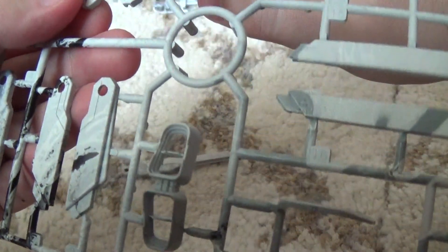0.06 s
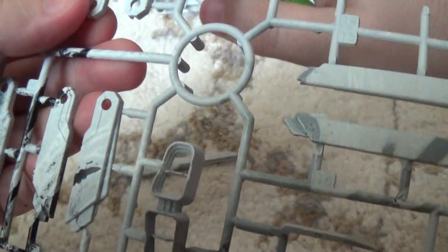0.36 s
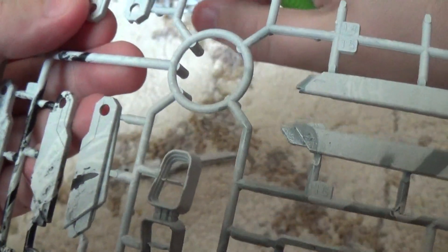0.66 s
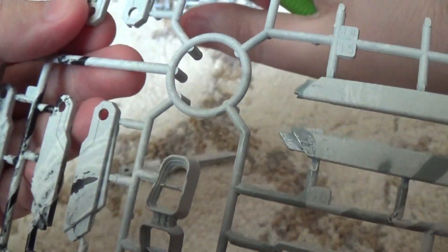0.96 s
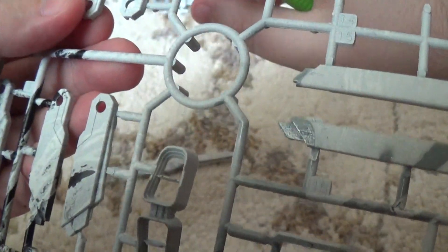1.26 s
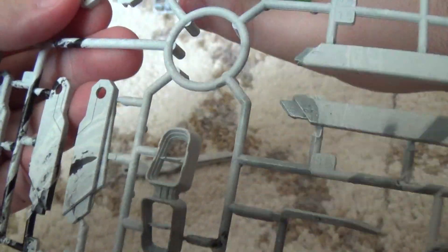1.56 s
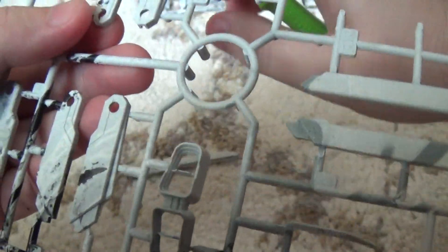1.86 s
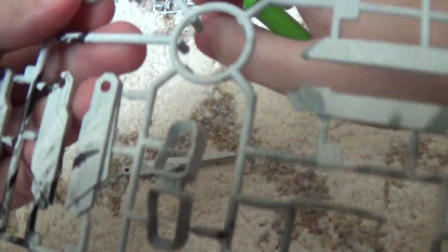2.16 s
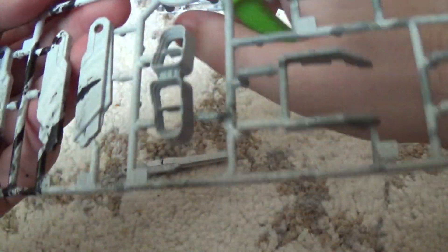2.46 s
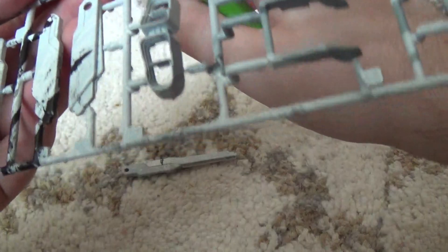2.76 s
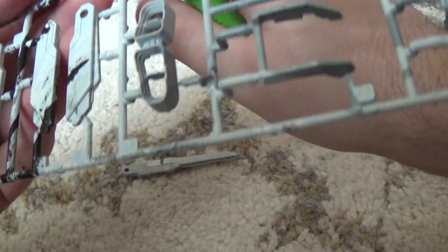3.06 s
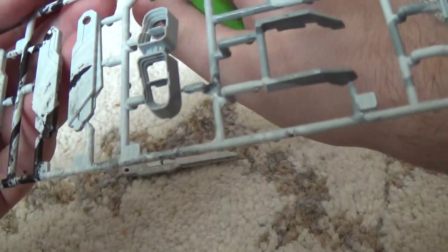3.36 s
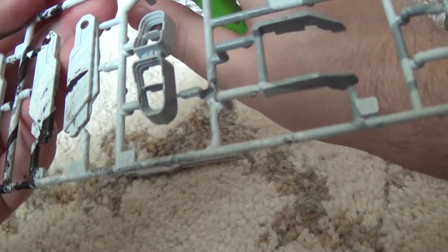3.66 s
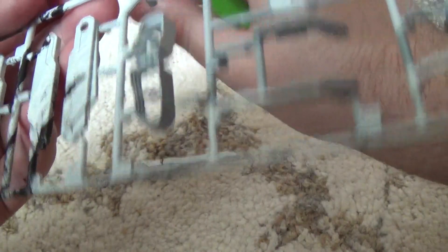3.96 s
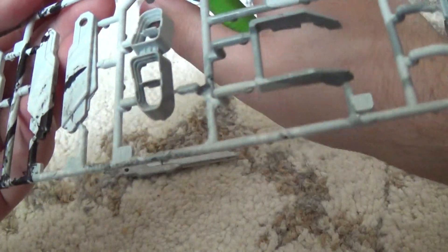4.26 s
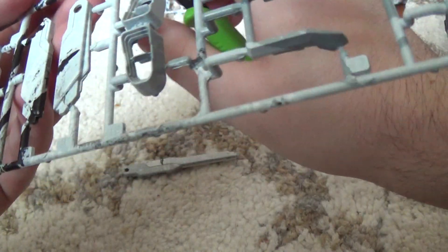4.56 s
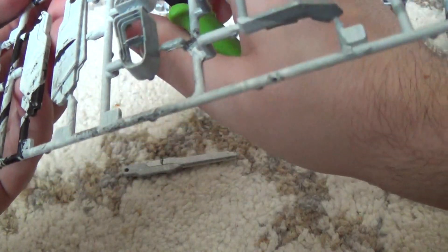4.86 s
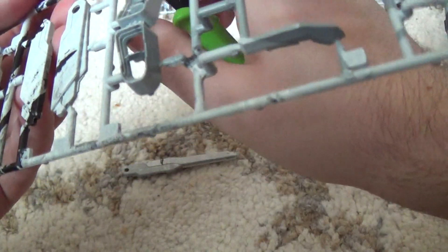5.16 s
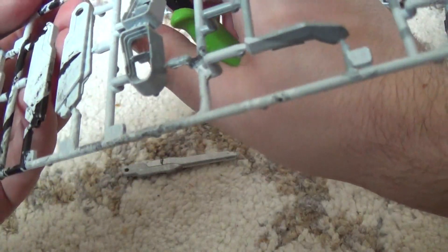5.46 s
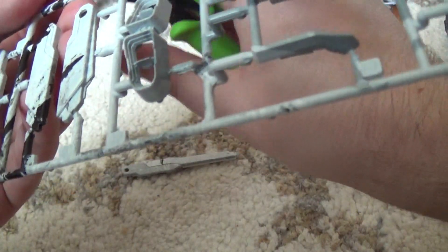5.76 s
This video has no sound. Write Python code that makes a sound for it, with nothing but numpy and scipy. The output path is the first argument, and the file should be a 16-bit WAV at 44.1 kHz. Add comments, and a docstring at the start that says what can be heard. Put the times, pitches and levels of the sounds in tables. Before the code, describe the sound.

Three crisp snips of small cutters through plastic, spaced by light ticks and a soft hollow pop, over faint hiss and hum.

```python
"""A quiet room, camera microphone close up: side cutters snip three parts off a plastic model-kit frame.
Hiss, mains hum and a thin electronic whine run throughout; from the start the handled frame ticks.
At 1.3 s the plastic strains and cracks twice, a millisecond apart; the steel jaws ring, the frame recoils
and each cut has its own ringing colour. A part flexes with a hollow tock, the blades scrape into place
and cut again at 4 s. A blade creaks at 4.6 s, and one more scrape leads to the last cut at 5.7 s."""
import sys
import numpy as np
from scipy import signal
from scipy.fft import rfft, irfft, next_fast_len
from scipy.io import wavfile
from scipy.ndimage import uniform_filter1d

SR = 44100
rng = np.random.default_rng(int(sys.argv[2]) if len(sys.argv) > 2 else 0)


def int16_out(signal):
    """Quantize to a 16-bit WAV file."""
    q = np.round(np.clip(np.atleast_2d(signal).T, -1, 1) * 32767)
    wavfile.write(sys.argv[1], SR, q.astype(np.int16))


N = 260704

# the room's decay: f/Hz, t60/s
ROOM_DECAY = [(150, 0.33), (1000, 0.17), (6000, 0.19), (14000, 0.13)]
# side signal of the reflections: f/Hz, level/dB
WIDTH = [(100, -17), (380, -19), (700, -3), (1300, -8), (2400, -5.5), (5000, -3.5), (15000, -4)]
# room tone spectra, mid and side: f/Hz, relative level/dB
AIR_MID = [(12, -28), (25, -5), (50, -0.5), (100, -0.5), (175, -0.5), (210, -5.5), (370, -7.5), (520, -11),
           (1000, -13.5), (3000, -15.5), (8000, -18), (15500, -20.5)]
AIR_SIDE = [(30, -24), (100, -13.5), (300, -3), (800, 0), (2000, -4), (4000, -9.5), (8000, -16.5),
            (15000, -34)]
# mains harmonics: f/Hz, level/dB
HUM = [(60, -80.5), (120, -73), (180, -79.5)]
# light contacts on the frame: t/s, level/dB, hardness (relative treble)/dB, nudge level/dB
TICKS = [(0.0315, -31, -13, -38), (0.0906, -39, -24, -37), (0.2162, -45, -4, -52),
         (0.2413, -35, -15.5, -31.5), (1.5278, -36, -3.5, -57), (2.005, -35.5, -17.5, -56),
         (2.6703, -27, -20.5, -37), (2.769, -33, -27, -33.5), (3.3273, -31.5, -14, -35.5),
         (3.6544, -43, -26, -34.5), (3.971, -40, -8.5, -56), (4.154, -34, -10, -49),
         (4.302, -27.5, -16, -47), (4.6608, -26, -16.5, -43)]
# spectra of a contact's dull tap and hard edge: f/Hz, relative level/dB
DULL_TAP = [(100, -1), (400, -2.5), (650, -3), (1000, -9), (2200, -1.5), (3000, -6.5), (4000, -7),
            (8000, -34), (15000, -32)]
HARD_EDGE = [(1000, -37), (4000, -8), (6800, 1.5), (9000, -2.5), (11500, 0.5), (14000, -14), (16000, -17)]
# modes of the frame, tapped and nudged as a whole: f/Hz, relative level/dB, t60/s
FRAME_MODES = [(1380, -8, 0.11), (1650, -4, 0.025), (2060, 4, 0.019), (2390, 11.5, 0.014),
               (2555, -13, 0.21), (2855, -1, 0.022), (3580, -17, 0.016), (4150, -3, 0.026),
               (4580, -1, .025), (5100, 7, 0.022)]
SWAY_MODES = [(179, -0.5, 0.052), (297, -5.5, 0.085), (382, 2, 0.14)]
# tiny cracks under the blades: t/s, level/dB
STRAINS = [(1.3228, -37), (1.3322, -35), (1.338, -39), (3.997, -35)]
# the cuts: t/s, first crack/dB, second crack/dB, crack pitch ratio, jaws/dB, jaw centre f/Hz,
# ringing colour/dB, snap/dB, snap pitch ratio, recoil/dB, knock/dB, knock f/Hz, room send/dB
CUTS = [(1.3477, 2.5, -1, 0.89, -8, 9500, -2, -18, 1.54, -20, -20.5, 372, -1.5),
        (4.0032, -8, 2, 1.03, -5, 7700, -7, -9, 1.06, -23.5, -14, 342, -1.5),
        (5.7416, -5, 3.5, 1.03, -8, 8000, -6, -12.5, 1.05, -25, -18, 348, -0.5)]
# spectra of a crack's lower skirt and the frame's dry snap: f/Hz at pitch ratio 1, relative level/dB
CRACK_SKIRT = [(200, -24), (900, -28.5), (2000, -17.5), (4400, -16), (5650, -1.5)]
SNAP = [(200, -33), (900, -28.5), (1250, -8), (1600, -2), (2020, 4.5), (2230, -2.5), (2480, 0), (2900, -1),
        (4200, -3.5), (5000, -12), (9000, -12.5)]
# treble of a crack: f/Hz, relative level/dB
CRACK_TREBLE = [(6900, 0.5), (8300, 0), (9900, -4), (11800, 1), (14000, -9), (16000, -13)]
# modes of the steel jaws and the recoiling frame: f/Hz, relative level/dB, t60/s
JAW_MODES = [(5240, 0, 0.031), (6000, -3, 0.017), (6450, -5, 0.013), (7550, 2, 0.01), (7830, 5.5, 0.009),
             (8710, 8.5, 0.011), (11300, -5, 0.011), (12600, -14, 0.012)]
RECOIL_MODES = [(126, -2.5, 0.046), (215, 4.5, 0.026), (380.6, -7, 0.2)]
# each cut's own ringing colour, brief bright peaks over a faint low ring: f/Hz, relative level/dB, t60/s
CUT_RING_MODES = [
    [(378, -22, .27), (1340, -30, .1), (2190, -8, 0.011), (2420, -4, 0.011), (2470, -28, 0.14),
     (4900, -5, .009), (5740, -1, .014), (8620, -8, .012), (10280, 2.5, 0.012), (11330, 3, 0.014)],
    [(680, -8, .025), (1326, -16, .06), (1610, -3, 0.02), (1970, -1, 0.02), (2480, -1, 0.022),
     (3230, 0.5, .01), (4130, -2, 0.023), (6180, 6, 0.014), (12400, 5.5, .01)],
    [(635, -33, .13), (1280, -23, .06), (1630, -20, 0.041), (2100, -10, .012), (2820, -14, 0.018),
     (3650, -17.5, .04), (4520, -13.5, 0.019), (6640, 1, .014), (12100, 3, .007)],
]
# parts flexing: t/s, level/dB, which part
TOCKS = [(1.955, -15, "shell"), (3.327, -26, "strut"), (4.661, -31, "strut")]
# modes of a shell-like part and a thin strut: f/Hz, relative level/dB, t60/s
SHELL_MODES = [(1230, -17, 0.004), (1660, -4.5, 0.015), (2500, -5, 0.0059), (3480, -11, 0.0065)]
STRUT_MODES = [(1630, 2.5, 0.017), (2470, 4, 0.018), (2860, 2.5, 0.015), (4230, -10, .02), (7000, -5, .009)]
# blades sliding into place: start t/s, end t/s, level/dB
SCRAPES = [(2.788, 2.86, -69), (4.247, 4.324, -60), (4.368, 4.436, -65.5), (5.14, 5.302, -65)]
# spectrum of steel sliding on plastic: f/Hz, relative level/dB
RASP = [(150, -23), (500, 4), (1000, -2), (2000, -4), (4000, -2.5), (6500, 0), (9000, -4.5), (11600, 4.5),
        (13500, -16), (16000, -18)]
# a blade creaking on the plastic: start t/s, end t/s, level/dB
CREAK = (4.6277, 4.641, -23.5)
# modes of blade against frame: f/Hz, relative level/dB, t60/s
SQUEAK_MODES = [(1690, -2, 0.02), (1955, -1, 0.032), (3020, -2, 0.05), (5030, -2, 0.025), (6660, 2, 0.015),
                (7740, -6, .015)]
# the edge singing as it seats: start t/s, length/s, f/Hz, peak level/dB
SQUEAL = (4.633, .009, 11350, -54)

WHINE_HZ, FRAME_RATE_HZ, TOP_HZ = 15734, 30, 16150  # the whine of a television's line scan, the camera's frame rate and band limit
TICK_T60_S, TICK_RING_DB = 0.019, -7.5
BITE_S, BITE_DB = 0.0023, -49  # the edges bite this long before the first crack
STEP_S, CRACK_T60_S = 0.00109, 0.0049  # the plastic gives way in two steps, this far apart
RELEASE_S = 0.0003  # from the first crack until the frame springs free
KNOCK_DELAY_S, KNOCK_RISE_S, KNOCK_T60_S = 0.0005, 0.013, 0.023  # the freed frame jumps in the hand


def amp(db):
    """Decibels to gain."""
    return 10 ** (np.asarray(db) / 20)


def unit_rms(x):
    """Scale to rms 1."""
    return x / np.sqrt(np.mean(x ** 2) + 1e-20)


def unit_energy(x):
    """Scale to energy 1."""
    return x / (np.linalg.norm(x) + 1e-20)


def along(points, hz):
    """Read (f/Hz, value) points on a log frequency axis."""
    freqs, values = np.transpose(points)
    return np.interp(np.log(hz + 1), np.log(freqs), values)


def filtered(x, response):
    """Zero-phase filter whose gain is response(hz)."""
    n = x.shape[-1]
    size = next_fast_len(n + SR // 4)
    return irfft(rfft(x, size) * response(np.fft.rfftfreq(size, 1 / SR)), size)[..., :n]


def coloured(x, spectrum, size=2048):
    """Causal filter with the given spectrum, so that attacks stay sharp."""
    gain = amp(along(spectrum, np.fft.rfftfreq(size, 1 / SR)))
    cepstrum = irfft(np.log(gain))
    cepstrum[1:size // 2] *= 2
    cepstrum[size // 2:] = 0
    return signal.fftconvolve(x, irfft(np.exp(rfft(cepstrum))))[:len(x)]


def noise(spectrum):
    """Steady noise of rms 1."""
    return unit_rms(filtered(rng.standard_normal(N), lambda hz: amp(along(spectrum, hz))))


def clock():
    """The time axis of one short sound."""
    return np.arange(SR // 3) / SR


def fade(t, t60):
    """Exponential decay by 60 dB in t60."""
    return np.exp(-np.log(1000) * t / np.maximum(t60, 1e-4))


def add(track, s, sound):
    """Mix a sound into the track at s seconds."""
    span = track[..., max(round(s * SR), 0):][..., :sound.shape[-1]]
    span += sound[..., :span.shape[-1]]


def spray(t60):
    """Dying noise of energy 1, spread evenly over all bands."""
    t = clock()
    bins = rfft(rng.standard_normal(len(t)) * fade(t, t60))
    band_level = np.sqrt(np.abs(uniform_filter1d(np.abs(bins) ** 2, size=160)))
    return unit_energy(irfft(bins / band_level, len(t)) * (t < t[-1] / 2))


def burst(spectrum, t60):
    """Dying noise with the given spectrum, energy 1."""
    return unit_energy(coloured(spray(t60), spectrum))


def ring(modes, attack_s):
    """Damped modes, struck a little differently each time, energy 1."""
    t = clock()
    strength_db = rng.standard_normal(len(modes))
    tones = sum((-1) ** k * amp(db + strength_db[k]) * fade(t, t60) * np.sin(2 * np.pi * hz * t)
                for k, (hz, db, t60) in enumerate(modes))
    return unit_energy(tones * (1 - np.exp(-t / attack_s)))


def favour(modes, centre_hz):
    """Where a body is struck decides which of its modes speak: those near the centre frequency."""
    return [(hz, db - 15 * abs(np.log2(hz / centre_hz)), t60) for hz, db, t60 in modes]


def room_tone():
    """Air and hiss, mains hum, a line-scan whine and a faint buzz pulsing at the camera's frame rate."""
    t = np.arange(N) / SR
    hum = sum(amp(db) * unit_rms(np.sin(2 * np.pi * (hz * t + rng.random()))) for hz, db in HUM)
    flutter = unit_rms(filtered(rng.standard_normal(N), lambda hz: 1 / (1 + (hz / 150) ** 2)))
    whine = amp(-69.5) * unit_rms((1 + 0.12 * flutter) * np.sin(2 * np.pi * WHINE_HZ * t))
    pulse = np.exp(3 * np.cos(2 * np.pi * FRAME_RATE_HZ * t))
    buzz_band = noise([(2500, -41), (3000, -12), (3170, 12), (3350, -2), (4000, -41)])
    buzz = amp(-78.5) * unit_rms(pulse * buzz_band)
    mid = amp(-61) * noise(AIR_MID) + hum + whine + buzz
    side = amp(-67.5) * noise(AIR_SIDE)
    return np.array([mid + side, mid - side])


def ticks():
    """Light contacts tap and ring the frame; hard ones have a sharp edge, a nudge adds a low knock."""
    out = np.zeros(N)
    for s, db, hardness_db, nudge_db in TICKS:
        tap = amp(-2) * burst(DULL_TAP, TICK_T60_S)
        edge = amp(hardness_db + 13) * burst(HARD_EDGE, TICK_T60_S)
        knock = amp(nudge_db) * ring(SWAY_MODES, attack_s=0.0018)
        frame = amp(TICK_RING_DB) * ring(FRAME_MODES, attack_s=0.00044)
        add(out, s, amp(db) * (tap + edge + frame) + knock)
    return out


def reflections():
    """Impulse response of the surroundings at the microphone: two reflections and the room's tail."""
    t = clock()
    hz, times, bands = signal.stft(rng.standard_normal(len(t)), SR, nperseg=256)
    _, tail = signal.istft(bands * fade(times, along(ROOM_DECAY, hz)[:, None]), SR, nperseg=256)
    out = np.zeros(len(t))
    add(out, 0.002, amp(-15.5) * spray(t60=0.03))  # hands and camera, close by
    add(out, 0.0235, amp(-32) * spray(t60=0.0049))  # a far wall
    add(out, 0.007, amp(-21.5) * unit_energy(tail))
    return coloured(out, [(350, 6.5), (1100, 12), (2000, 9), (6000, 0), (14000, -4)])


def room(x, send_db):
    """The direct sound is dead centre; only the reflections have width."""
    mid = x + amp(send_db) * signal.fftconvolve(x, reflections())[:len(x)]
    side = amp(send_db) * signal.fftconvolve(x, coloured(reflections(), WIDTH))[:len(x)]
    return np.array([mid + side, mid - side])


def strains():
    """The squeezed plastic crackles faintly just before it gives way."""
    out = np.zeros(N)
    for s, db in STRAINS:
        add(out, s, amp(db) * burst(CRACK_SKIRT + CRACK_TREBLE, t60=0.016))
    return out


def snips():
    """The plastic cracks twice with a brief ring; its release snaps the jaws shut and kicks the frame."""
    out = np.zeros((2, N))
    for row, ring_modes in zip(CUTS, CUT_RING_MODES):
        (s, first_db, second_db, crack_pitch, jaw_db, jaw_hz, colour_db,
         snap_db, snap_pitch, recoil_db, knock_db, knock_hz, send_db) = row
        # thicker plastic cracks lower
        crack = [(hz * crack_pitch, db) for hz, db in CRACK_SKIRT] + CRACK_TREBLE
        cut = amp(BITE_DB) * burst(crack, t60=0.009)
        add(cut, BITE_S, amp(first_db) * burst(crack, CRACK_T60_S))
        add(cut, BITE_S + STEP_S, amp(second_db) * burst(crack, CRACK_T60_S))
        jaws = amp(jaw_db) * ring(favour(JAW_MODES, jaw_hz), attack_s=0.00059)
        colour = amp(colour_db) * ring(ring_modes, attack_s=0.00023)
        recoil = amp(recoil_db) * ring(RECOIL_MODES, attack_s=0.0011)
        # the frame's many heavily damped modes merge into a dry snap
        snap = amp(snap_db) * burst([(hz * snap_pitch, db) for hz, db in SNAP], t60=0.019)
        add(cut, BITE_S + RELEASE_S, jaws + colour + recoil + snap)
        knock = amp(knock_db) * ring([(knock_hz, 0, KNOCK_T60_S)], attack_s=KNOCK_RISE_S)
        add(cut, BITE_S + KNOCK_DELAY_S, knock)
        add(out, s - BITE_S, room(cut, send_db))
    return out


def tocks():
    """A shell or a strut flexes with a soft, hollow pop."""
    out = np.zeros(N)
    for s, db, part in TOCKS:
        modes = SHELL_MODES if part == "shell" else STRUT_MODES
        add(out, s, amp(db) * ring(modes, attack_s=0.00077))
    return out


def scrapes():
    """Tiny slips of steel on plastic rasp and stir the frame's modes."""
    t = np.arange(N) / SR
    strokes = np.zeros(N)
    for start, end, db in SCRAPES:
        progress = np.clip((t - start) / (end - start), 0, 1)
        strokes += amp(db) * np.sqrt(np.abs(np.sin(np.pi * progress)))
    slips = rng.standard_normal(N) * (rng.random(N) < 1200 / SR)  # about 1200 a second
    one_slip = burst(RASP, t60=0.019) + amp(-11.5) * ring(FRAME_MODES, attack_s=0.0002)
    return strokes * unit_rms(signal.fftconvolve(slips, one_slip)[:N])


def creak():
    """A blade lands on the frame, chatters along it in quick slips and ends in a brief squeal."""
    out = np.zeros(N)
    start, end, db = CREAK
    landing = ring(SQUEAK_MODES, attack_s=0.00026) + amp(-12) * burst(DULL_TAP, t60=0.012)
    add(out, start, landing)
    for s in np.linspace(start, end, num=12) + 0.0003 * rng.standard_normal(12):
        slip = amp(-15) * ring(SQUEAK_MODES, attack_s=0.00033) + amp(-13) * burst(RASP, t60=0.0062)
        add(out, s, slip)
    out = amp(db) * unit_energy(out)
    squeal_s, length_s, hz, squeal_db = SQUEAL
    t = np.arange(round(length_s * SR)) / SR
    add(out, squeal_s, amp(squeal_db) * signal.windows.hann(len(t)) * np.sin(2 * np.pi * hz * t))
    return out


def scene():
    """Cutting and handling in a small room; the tocks are closest to the microphone and driest."""
    cutting = snips()
    handling = ticks() + strains() + creak() + scrapes()
    return cutting + room(handling, send_db=0.5) + room(tocks(), send_db=-13) + room_tone()


def record(dry):
    """The camera keeps nothing above its band limit."""
    return filtered(dry, lambda hz: 1 / np.sqrt(1 + (hz / TOP_HZ) ** 200))


dry = scene()
out = record(dry)
int16_out(out)
```